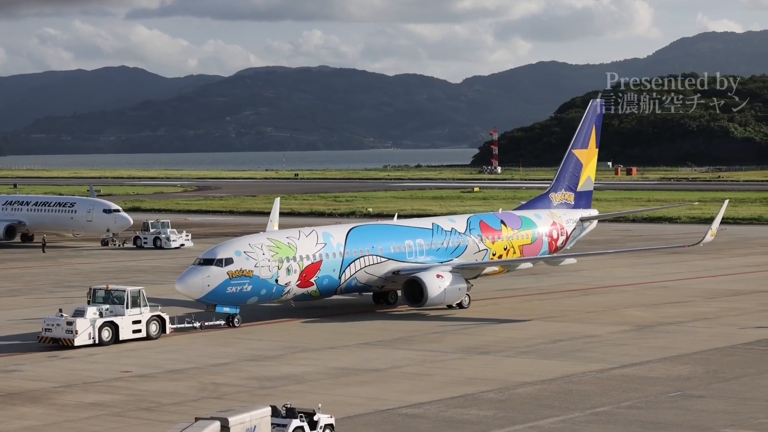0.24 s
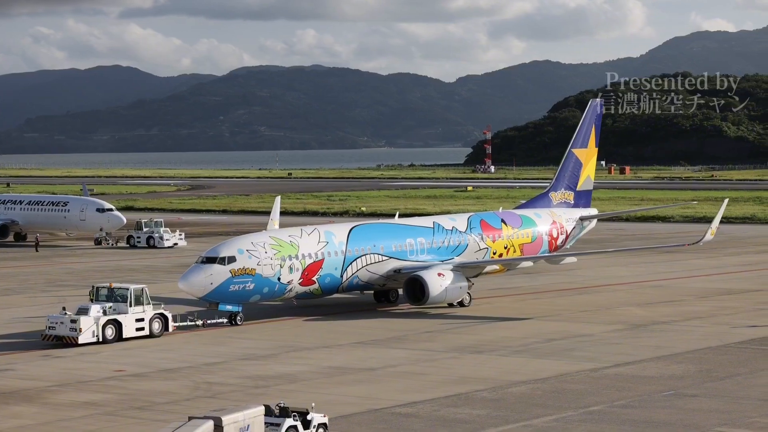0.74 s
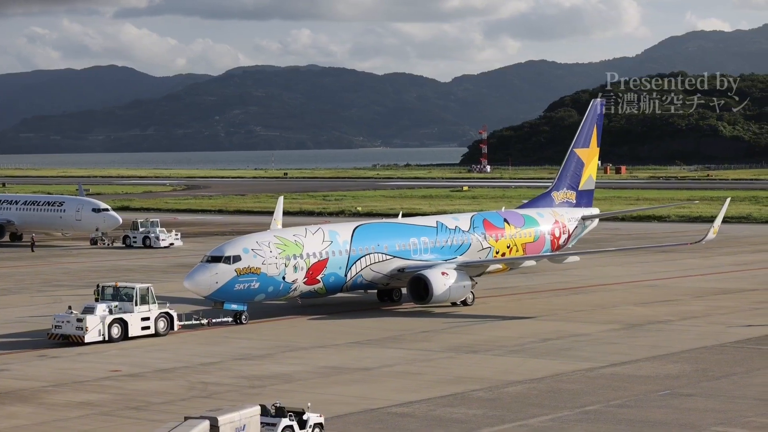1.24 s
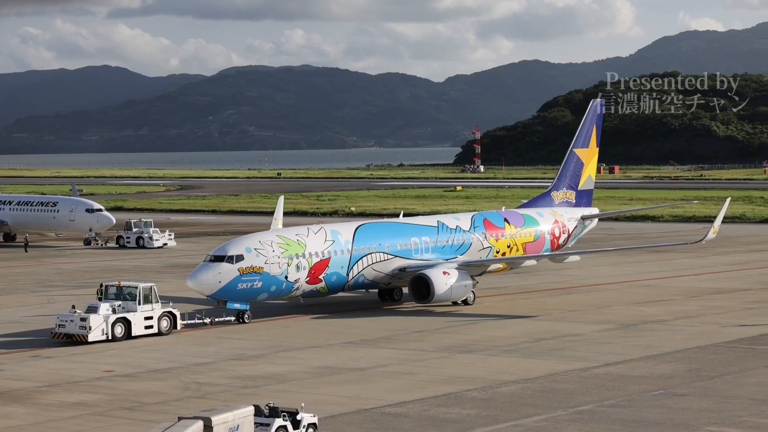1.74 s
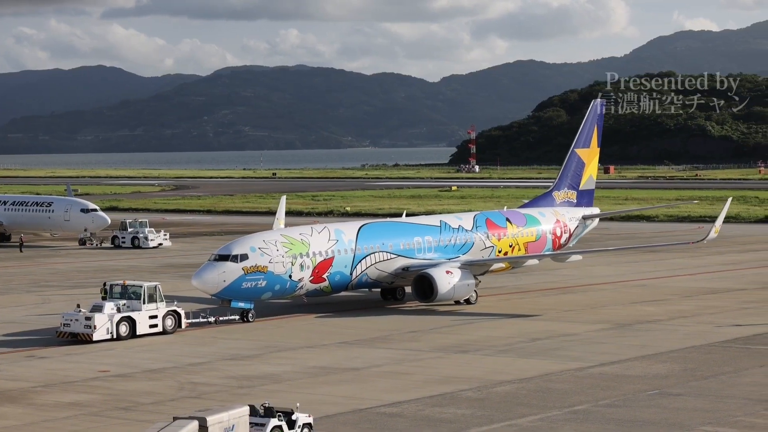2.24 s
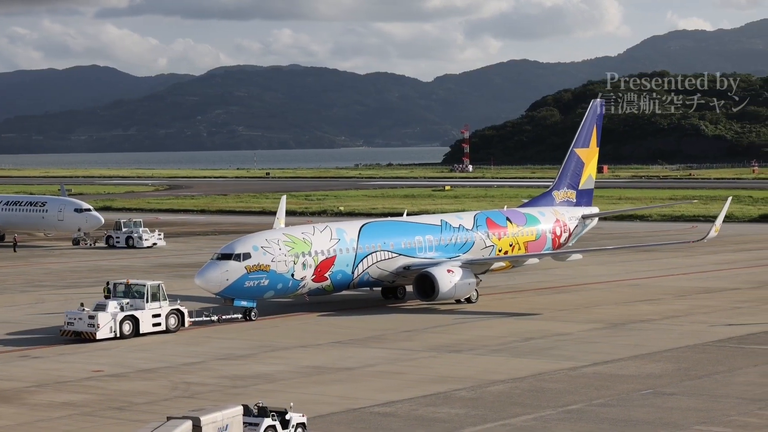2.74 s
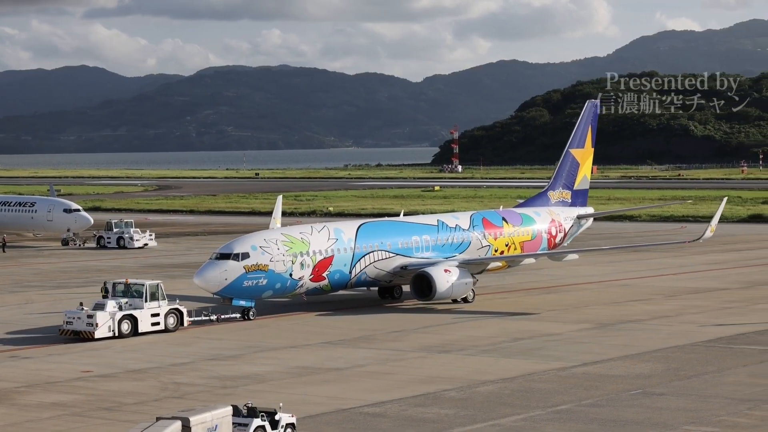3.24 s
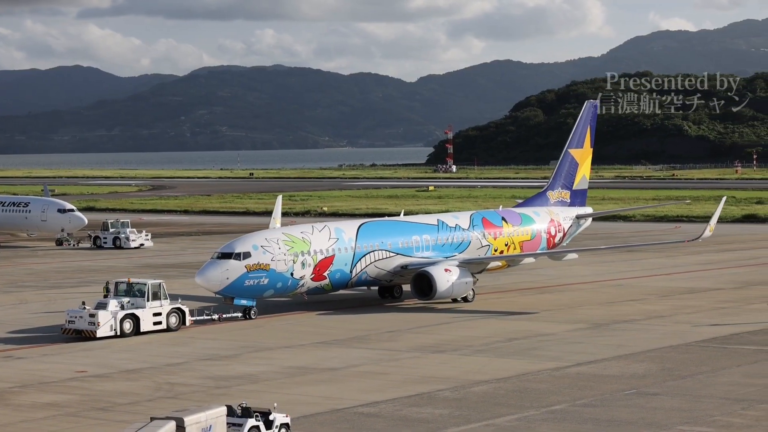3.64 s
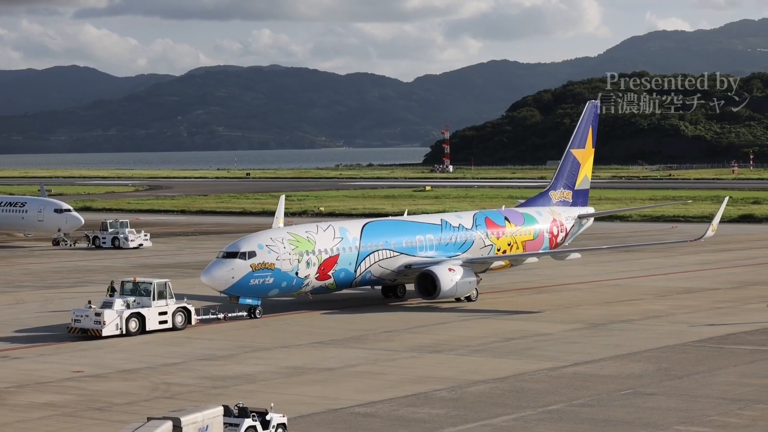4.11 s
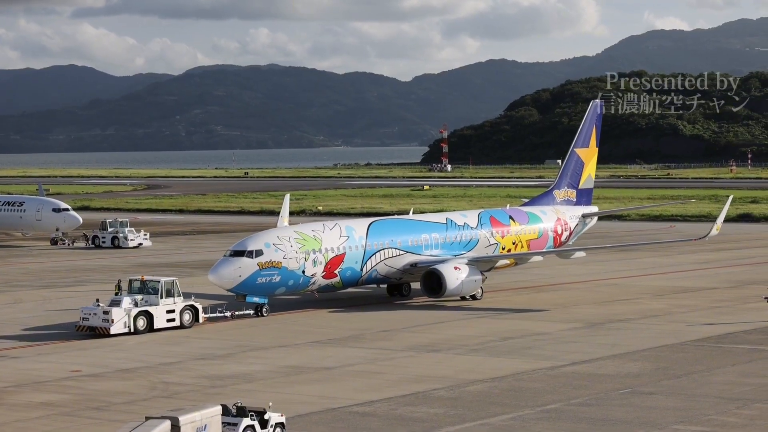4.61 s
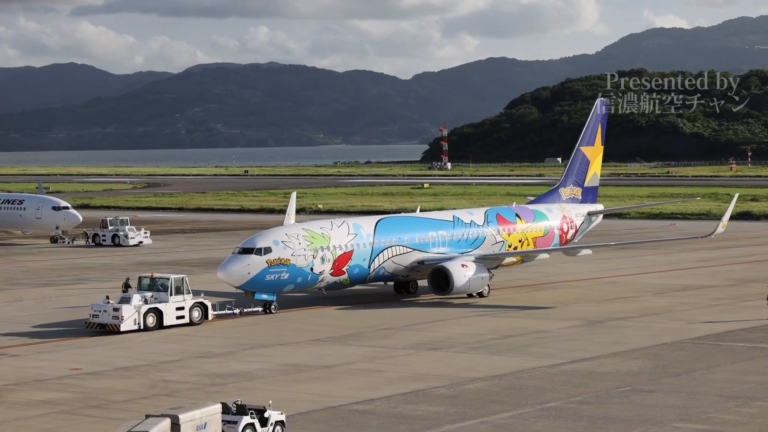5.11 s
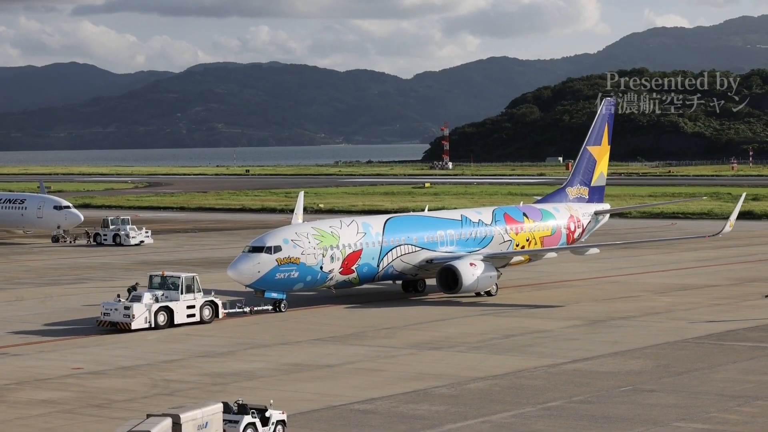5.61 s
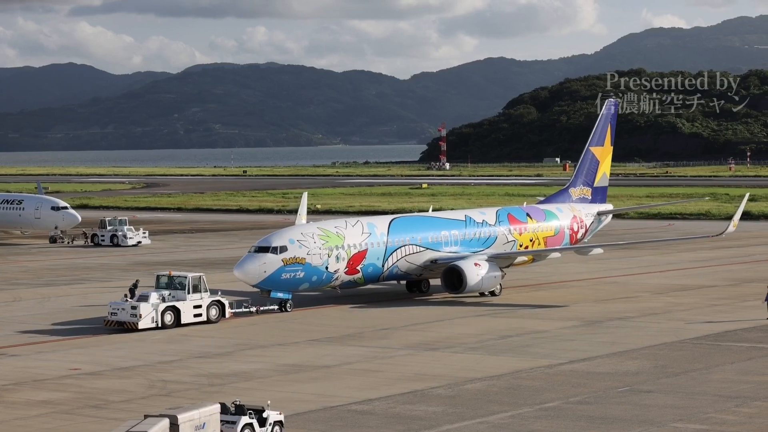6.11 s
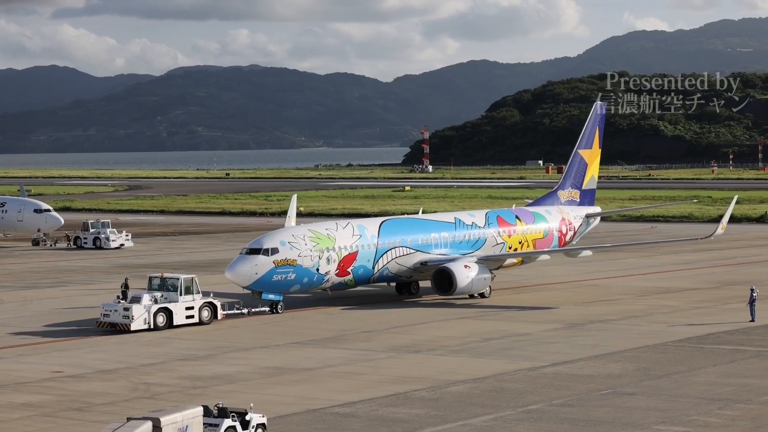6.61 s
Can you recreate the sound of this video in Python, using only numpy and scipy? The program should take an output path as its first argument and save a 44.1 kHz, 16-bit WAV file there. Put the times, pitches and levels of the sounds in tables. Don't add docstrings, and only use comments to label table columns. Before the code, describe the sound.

Rough wind blasts overload a microphone on an open airport apron, with a wavering high jet whine and soft roar rising behind them.

```python
import sys
import numpy as np
from scipy import signal
from scipy.fft import rfft, irfft
from scipy.io import wavfile
from scipy.ndimage import uniform_filter1d

SR = 44100
rng = np.random.default_rng(int(sys.argv[2]) if len(sys.argv) > 2 else 0)


def store_wav(level_fs):
    pcm = np.round(np.clip(np.atleast_2d(level_fs), -1, 1) * 32767)
    wavfile.write(sys.argv[1], SR, pcm.T.astype(np.int16))


def rack_gain(trim_db):
    fader = np.asarray(trim_db, float)
    return 10 ** (fader / 20)


N = 302526
CONTROL_STEP = 40

# (time [s], level [dB], haze [dB])
ENGINE_GAIN = [(0.0, -42, 0), (0.23, -48.5, 3.5), (0.42, -44, 1), (0.76, -45.5, 2.5), (1.85, -36, 2.5),
               (2.52, -30, 0), (3.42, -33.5, 0.5), (3.51, -43.5, -1), (3.59, -49, -0.5), (3.69, -40.5, 0.5),
               (3.78, -43, 0.5), (4.32, -40, 2.5), (4.62, -36, 0.5), (5.62, -31.5, 3), (5.95, -36, 6.5),
               (6.12, -39, 6), (6.27, -46, 2), (6.86, -46.5, 3)]
TOP_DB, TOP_PER_HAZE = 1, -.4
# (frequency [Hz], density [dB per Hz])
ROAR_SPECTRUM = [(40, -8), (100, -2.5), (300, -8.5), (700, -4.5), (1250, -8.5), (1700, -7), (3200, -10.5),
                 (3800, -18.5), (6500, -26), (9000, -37.5), (11400, -44.5), (15000, -46), (16000, -54)]
# (centre [Hz], width [Hz], density [dB per Hz])
CHOPPED_HUMPS = [(2598, 430, -7.5), (5030, 760, -14), (7515, 620, -21), (8630, 360, -32.5),
                 (9640, 240, -29), (9940, 670, -33.5), (12600, 1200, -38)]
BLADE_RATES_HZ = [2450, 2534]
CLEAR_FANS_DB = [-1, -0.5]
# (level [dB], share of the fan's fading [0-1])
BLADE_ORDERS = [(-1, 1), (-11.5, .7), (-19.5, .3)]
# (middle [s], length [s], change [dB])
NEAR_FADES = [
    (0.1, .35, -14),
    (1.4, 0.34, -15),
    (2.4, .45, -3),
    (3.0, 0.17, -7),
    (3.75, .4, 3),
    (4.25, 0.32, -19),
    (5.05, 0.48, -25),
    (5.4, .25, 2),
    (6.12, .2, -6),
]
# (middle [s], length [s], change [dB])
FAR_FADES = [
    (0.2, .6, -12.5),
    (1.1, 1.0, -12),
    (1.85, .35, -16),
    (2.2, .15, 3),
    (3.15, 0.46, -8),
    (3.95, 0.79, -9),
    (4.85, .5, -5),
    (5.75, 0.43, -5),
    (6.5, .7, -5),
]
# (frequency [Hz], level over the engine level [dB])
INNER_WHINES = [(807, -10), (3061, -19), (3946, -26), (5612, -24), (5792, -28), (6040, -24.5), (6468, -25),
                (8328, -27), (8618, -28), (12895, -46)]
# (time [s], height [dB], pitch [Hz])
STRONG_EDDIES = [(0.0198, -1.5, 650), (0.0503, -3, 770), (0.1204, -3, 683), (0.1416, 3, 807),
                 (0.1749, 0, 815), (0.2201, 0.5, 830), (0.2832, 0.5, 530), (0.3286, -1, 724),
                 (0.4301, 1, 680), (0.4972, -3.5, 700), (0.6421, -6, 700), (1.1032, -2, 500),
                 (1.2426, -6, 800), (3.1193, -2.5, 706), (3.4332, 4, 513), (3.46, 8, 461),
                 (3.5825, -5, 560), (3.708, 3, 970), (3.7258, 3.5, 569), (3.7491, 4.5, 595),
                 (4.353, 1, 505), (4.8515, 5.5, 810), (4.9239, -0.5, 504), (5.7753, -1, 736),
                 (6.0556, 3.5, 480), (6.128, -4.5, 800), (6.1436, 3.5, 760), (6.2366, 4.5, 588),
                 (6.6143, -2, 615), (6.6884, -0.3, 870)]
# (time [s], height [dB])
FLUTTER_EDDIES = [(0.277, 0), (0.4486, -6), (0.5863, -7), (0.6305, -4), (0.7654, -7.5), (0.861, -4),
                  (3.059, -4), (3.4827, -8), (3.497, -3), (3.5432, -4), (3.5657, -3), (3.9968, -4.5),
                  (4.0258, -7.5), (4.319, -7), (5.5664, -4), (5.6858, -3), (5.9594, -4), (6.0352, -4.5),
                  (6.1773, 0), (6.19, -8), (6.3671, -9), (6.3948, -6), (6.4222, -10), (6.4945, -4.5),
                  (6.5454, -8), (6.6767, -5), (6.7022, -3), (6.829, -7.5), (6.8516, -4)]
# (time [s], height [dB])
THUD_EDDIES = [(0.135, -2), (0.285, -2), (0.595, -7), (1.7, -10), (1.9, -5), (1.974, -5), (2.79, -4),
               (3.085, -4), (3.365, -7), (3.45, -2.5), (4.33, -9), (4.41, -9), (4.87, -6), (5.65, -5),
               (6.035, -5), (6.12, -3), (6.38, -4)]
FLUTTER_HZ, THUD_HZ = 687, 238
# (pitch [Hz], level [dB], share of brightness, or of rumble if negative [dB per dB])
EDDY_SIZES = [(62, 0.5, -2.35), (102.2, -1, -0.65), (163.4, 5.5, -0.74), (247.8, 2, 0.05), (375.7, 2, 0.34),
              (562, -0.5, 1.01), (784, -5, 1), (1169, -3.5, 2.43), (1490, -24.5, 1.5)]
EDDIES_PER_CYCLE = .6
# (start [s], length [s], level [dB], brightness [dB])
STRONG_GUSTS = [(0.01, 0.068, -14, -3), (0.113, 0.079, -12.5, -0.5), (0.275, 0.0075, -14.5, -0.5),
                (0.325, 0.021, -13, -1), (0.421, 0.061, -14, -3), (0.515, 0.062, -15, -4.5),
                (0.592, 0.042, -14, -2), (0.693, 0.084, -16.5, -4.5), (1.017, 0.11, -17.5, -5),
                (1.873, 0.029, -16.5, -17), (2.697, 0.12, -14.5, -13), (3.022, 0.099, -13, -14.5),
                (3.432, 0.066, -8.5, -4), (3.51, 0.085, -16.5, -0.5), (3.681, 0.074, -14.5, -1),
                (3.893, 0.042, -12, -10.5), (3.974, 0.051, -15, -8.5), (4.318, 0.039, -14.5, -7),
                (4.846, 0.085, -13.5, -9), (5.653, 0.036, -14, -2), (5.724, 0.07, -12.5, -7),
                (5.832, .14, -14, -19), (5.997, 0.082, -13, -15), (6.114, 0.032, -9.5, -3),
                (6.153, 0.097, -16, 1), (6.351, 0.064, -12, -2.5), (6.501, 0.07, -15.5, -5),
                (6.602, 0.038, -14.5, -5), (6.672, 0.051, -15, 1), (6.826, .05, -13.5, -4.5)]
# (start [s], level [dB])
DULL_PUFFS = [(0.21, -13.5), (0.385, -22), (0.86, -17.5), (0.92, -22), (1.23, -17), (1.3, -26.5),
              (1.6, -22.5), (1.69, -21.5), (1.76, -25), (1.96, -18), (2.36, -17.5), (2.63, -21.5),
              (3.18, -23), (3.63, -18), (3.8, -13.5), (4.4, -20), (4.49, -28), (4.79, -19), (4.95, -29),
              (5.555, -17), (6.27, -17), (6.74, -17)]
PUFF_S, PUFF_BRIGHT_DB = 0.027, -10
RISE_DB_PER_S, FALL_DB_PER_S = 702, 503
# (middle [s], length [s], change [dB])
RUMBLE_HEAVES = [(0.13, 0.093, 6.5), (0.8, 0.16, -9), (1.912, .12, 7), (2.25, .15, -14), (2.444, 0.097, 11),
                 (2.754, 0.11, 5), (3.03, .1, 5), (4.6, .15, -8), (5.3, .3, -17), (5.66, 0.14, 8.5),
                 (6.05, 0.17, 5), (6.65, .25, -2)]
RUMBLE_DB, RUMBLE_LAG_S, RUMBLE_SLACK = -9.5, .12, 0.34
RUMBLE_SQUEEZE = .55
# (time [s], level [dB])
STEADY_BREEZE = [(0.0, -24.5), (0.7, -18), (1.0, -25.5), (1.18, -30.5), (1.55, -27.5), (1.95, -25),
                 (2.2, -25.5), (2.7, -22.5), (3.3, -23.5), (3.55, -16.5), (4.02, -32.5), (4.09, -33.5),
                 (4.5, -27), (5.0, -22.5), (5.2, -27.5), (5.55, -26), (5.85, -25), (6.45, -24.5)]
BREEZE_BRIGHT_DB = -4.5
LOW_CUT_HZ = 61.6


def engines():
    level_db, haze_db = in_time(ENGINE_GAIN)
    out = rack_gain(24.5) * roar(haze_db, TOP_DB + TOP_PER_HAZE * haze_db, patchy_db=1.27)
    out += fan(BLADE_RATES_HZ[0], CLEAR_FANS_DB[0], NEAR_FADES)
    out += fan(BLADE_RATES_HZ[1], CLEAR_FANS_DB[1], FAR_FADES)
    return rack_gain(level_db) * (out + whines())


def fan(blade_hz, clear_db, fades):
    heard_db = fading(clear_db, fades)
    usual_db, out = -5, 0
    for k, (db, share) in enumerate(BLADE_ORDERS):
        gain = rack_gain(db + usual_db + share * (heard_db - usual_db))
        out = out + gain * tone(blade_hz * (k + 1), steady=.6 / (k + 1), fade_db=.5 + k)
    return out


def whines():
    out = 0
    for hz, db in INNER_WHINES:
        out = out + rack_gain(db) * tone(hz, steady=min(.85, 2500 / hz), fade_db=2.5)
    return out


def tone(hz, steady, fade_db):
    smear = (drift(hz * .0025) + 1j * drift(hz * .0025)) * np.sqrt((1 - steady) / 2)
    fade = rack_gain(fade_db * drift(.8))
    turning = np.exp(2j * np.pi * hz * np.arange(N) / SR)
    return np.sqrt(2) * fade * ((np.sqrt(steady) + smear) * turning).real


def roar(body_db, top_db, patchy_db):
    hz = np.fft.rfftfreq(N, 1 / SR) + 1
    corner_hz, corner_db = np.transpose(ROAR_SPECTRUM)
    power = rack_gain(2 * np.interp(np.log(hz), np.log(corner_hz), corner_db))
    for hump_hz, width_hz, db in CHOPPED_HUMPS:
        power += rack_gain(2 * db) / (1 + (2 * (hz - hump_hz) / width_hz) ** 2) ** 2
    shaped = rfft(rng.standard_normal(N)) * np.sqrt(power)
    out, together = 0, drift(10.0)
    for octave in range(5, 15):
        share = np.cos(np.pi / 2 * np.clip(np.log2(hz) - octave, -1, 1)) ** 2
        flicker_db = patchy_db * (0.63 * together + 0.84 * drift(2.3))
        band_db = flicker_db + body_db * (octave < 12) + top_db * (octave > 12)
        out = out + irfft(shaped * share, N) * rack_gain(band_db)
    return out


def buffets():
    flutters = [(*row, FLUTTER_HZ) for row in FLUTTER_EDDIES]
    thuds = [(*row, THUD_HZ) for row in THUD_EDDIES]
    out = np.zeros(N + 2000)
    for s, db, hz in [*STRONG_EDDIES, *flutters, *thuds]:
        swing = eddy(hz, cycles=.8)
        start = round(s * SR) - len(swing) // 2
        out[start:start + len(swing)] += rack_gain(db - 4.0) * swing
    return out[:N]


def wind():
    gust_db, bright_db, rumble_db = gusting()
    out, clump_db = 0, 1.6 * drift(28.0) + 2.84 * drift(83.0)
    for hz, db, share in EDDY_SIZES:
        smallness = max(share, 0)
        born = rng.random(N) < EDDIES_PER_CYCLE * hz / SR
        push = np.where(rng.random(N) < .75, 1, -1)
        height_db = (0.85 + 2.8 * smallness) * np.minimum(rng.exponential(1, N), 3)
        clumps = rack_gain(clump_db * (0.51 + 0.58 * smallness))
        train = rms_one(born * rack_gain(height_db) * push * clumps)
        swings = rms_one(signal.fftconvolve(train, eddy(hz, cycles=0.52), "same"))
        colour_db = share * bright_db if share > 0 else -share * rumble_db
        out = out + rack_gain(db + colour_db) * evened(swings, 0.035 + 5.0 / hz)
    return rack_gain(gust_db - 7.0) * out


def gusting():
    t = np.arange(0, N + CONTROL_STEP, CONTROL_STEP) / SR
    power = rack_gain(2 * np.interp(t, *np.transpose(STEADY_BREEZE)))
    bright = power * BREEZE_BRIGHT_DB
    puffs = [(s, PUFF_S, db, PUFF_BRIGHT_DB) for s, db in DULL_PUFFS]
    for s, length, db, bright_db in [*STRONG_GUSTS, *puffs]:
        rise_db = RISE_DB_PER_S * np.minimum(t - s, 0)
        fall_db = FALL_DB_PER_S * np.maximum(t - s - length, 0)
        gust = rack_gain(2 * (db + rise_db - fall_db))
        power, bright = power + gust, bright + gust * bright_db
    gust_db, bright_db = in_time(np.transpose([t, 10 * np.log10(power), bright / power]))
    sluggish_db = uniform_filter1d(gust_db, int(RUMBLE_LAG_S * SR))
    rumble_db = RUMBLE_SLACK * (sluggish_db - gust_db) - RUMBLE_SQUEEZE * (sluggish_db + 18.5)
    return gust_db, bright_db, fading(RUMBLE_DB, RUMBLE_HEAVES) + rumble_db


def eddy(hz, cycles):
    t = np.arange(-2 * SR / hz, 2 * SR / hz) * hz / SR
    return np.exp(-(t / cycles) ** 2) * np.cos(2 * np.pi * t - 1.0)


def evened(x, seconds):
    local_power = uniform_filter1d(x ** 2, int(seconds * SR))
    return rms_one(x / (local_power + .05) ** .36)


def fading(clear_db, fades):
    t = np.arange(0, N + CONTROL_STEP, CONTROL_STEP) / SR
    level_db = clear_db + sum(db * np.exp(-(2 * (t - s) / length) ** 2) for s, length, db in fades)
    return in_time(np.transpose([t, level_db]))[0]


def drift(rate_hz):
    r = np.exp(-2 * np.pi * rate_hz * CONTROL_STEP / SR)
    noise = rng.standard_normal(N // CONTROL_STEP + 2002)
    slow = signal.lfilter([1], [1, -2 * r, r * r], noise)[2000:]
    return np.interp(np.arange(N) / CONTROL_STEP, np.arange(len(slow)), rms_one(slow))


def in_time(rows):
    s, *columns = np.transpose(rows)
    return [np.interp(np.arange(N) / SR, s, c) for c in columns]


def rms_one(x):
    return x / np.sqrt(np.mean(x ** 2) + 1e-20)


def scene():
    return (engines() + wind() + buffets())[None]


def low_pass(x):
    return signal.sosfilt(signal.butter(12, 15640, fs=SR, output="sos"), x)


def record(dry):
    wind_filter = signal.butter(2, LOW_CUT_HZ, "high", fs=SR, output="sos")
    cut = signal.sosfilt(wind_filter, dry)
    full = np.clip(1.728 * np.tanh(cut / 1.869), -1, 1)
    return low_pass(full)


dry = scene()
out = record(dry)
store_wav(out)
```